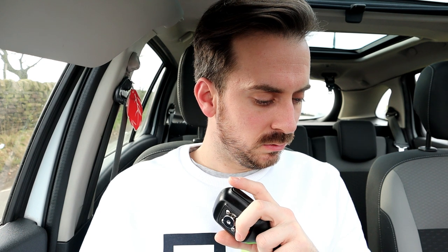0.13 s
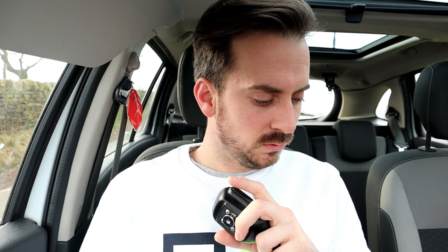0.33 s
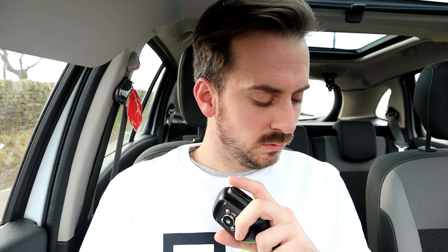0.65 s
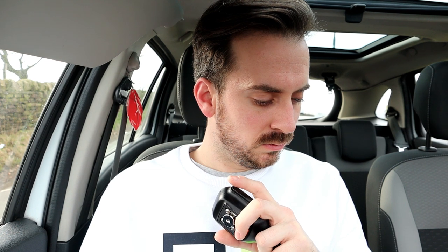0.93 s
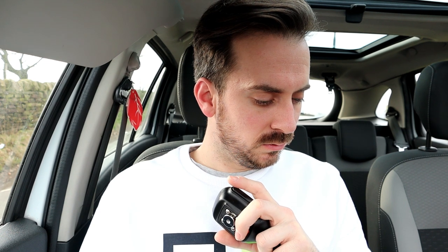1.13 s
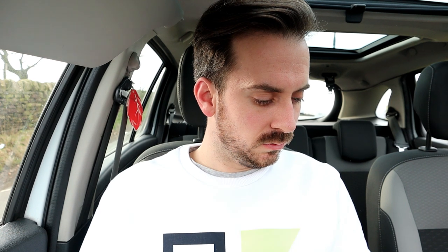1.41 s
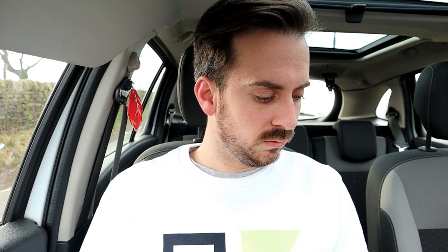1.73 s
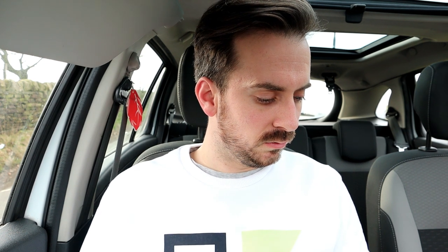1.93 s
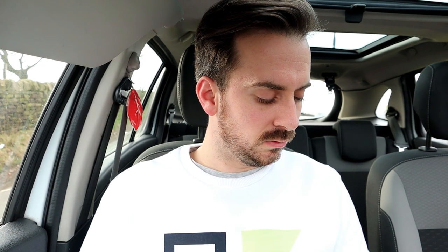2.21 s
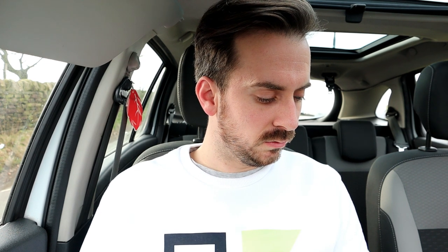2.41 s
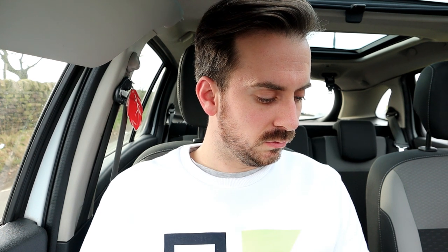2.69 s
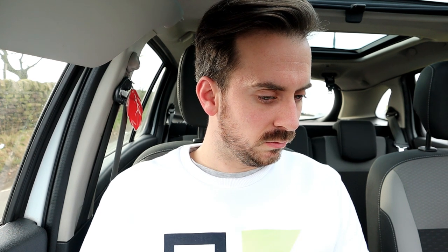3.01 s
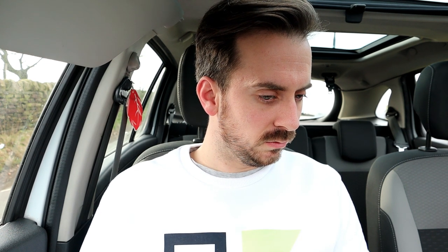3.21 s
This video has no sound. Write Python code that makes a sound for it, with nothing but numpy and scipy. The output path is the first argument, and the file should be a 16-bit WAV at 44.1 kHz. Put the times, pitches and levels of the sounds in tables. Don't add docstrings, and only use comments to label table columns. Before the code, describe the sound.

A four-cylinder car engine idles steadily from start to end, about 3.4 seconds, a deep boomy drone heard inside the parked cabin. Faint belt whine, a soft regular knock and tick, and muffled engine-bay noise ride on it. Near 1.7 and 2.0 seconds a small plastic case clicks down, with faint bright cloth rustles from 1.6 to 2.1 and tiny flicks near 2.5 and 2.7. Wide stereo, bass centred.

```python
import sys
import numpy as np
from scipy import signal
from scipy.fft import rfft, irfft, next_fast_len
from scipy.io import wavfile
from scipy.ndimage import uniform_filter1d, map_coordinates

SR = 44100
rng = np.random.default_rng(int(sys.argv[2]) if len(sys.argv) > 2 else 0)


def wrap_up_sound(samples):
    columns = np.atleast_2d(samples).T
    tamed = np.clip(columns, -1, 1)
    steps = np.round(tamed * 32767).astype(np.int16)
    wavfile.write(sys.argv[1], SR, steps)


def boost(x):
    u = np.asarray(x, float) / 20
    return 10 ** u


N = 147735
FIRING_HZ = 26.657
CYCLE_S = 4 / FIRING_HZ


def unit(x):
    return x / np.sqrt(np.mean(x ** 2) + 1e-20)


def along(points, hz):
    point_hz, value = np.transpose(points)
    return np.interp(np.log(hz + 1), np.log(point_hz + 1), value)


def wobble(rate_hz):
    knots = rng.standard_normal(int(N * rate_hz / SR) + 4)
    return map_coordinates(knots, [np.arange(N) * rate_hz / SR])


def filtered(x, response):
    size = next_fast_len(N + 8192)
    spectrum = rfft(x, size) * response(np.fft.rfftfreq(size, 1 / SR))
    return irfft(spectrum, size)[..., :N]


def rush(spectrum, patchy_db):
    bins = signal.stft(rng.standard_normal(N + 512), nperseg=512)[2]
    patches = uniform_filter1d(rng.standard_normal(bins.shape), size=5, axis=0)
    patches = unit(uniform_filter1d(patches, size=10, axis=1))
    noise = signal.istft(bins * boost(patchy_db * patches), nperseg=512)[1][:N]
    low_hz, high_hz = spectrum[0][0], spectrum[-1][0]

    def response(hz):
        edge = np.minimum(1, np.minimum(hz / low_hz, high_hz / (hz + 1))) ** 4
        return boost(along(spectrum, hz)) * edge

    return unit(filtered(noise, response))


def phase_turn(hz, centre_hz, width_hz):
    return np.arctan2(hz * width_hz, centre_hz ** 2 - hz ** 2)


def drone():
    # order, level_db
    orders = [(1, -25.5), (2, 0), (3, -10), (4, -20), (5, -8.5), (6, -17.5), (7, -20), (8, -23), (9, -32.5),
              (10, -38.5), (11, -30.5), (12, -29.5), (13, -39.5), (14, -40), (15, -32.5), (16, -35.5),
              (17, -45), (18, -44.5), (19, -46.5), (20, -38), (21, -37)]
    # hz, level_db
    side_level = [(50, -59), (130, -39.5), (190, -24), (260, -9.5), (400, -15.5), (800, -8.5)]
    first_firing_s, wander_rad, strongest_db = .0204, .06, -19.5
    cycle = 2 * np.pi * FIRING_HZ * (np.arange(N) / SR - first_firing_s) + wander_rad * wobble(1.5)
    out = np.zeros((2, N))
    for k, db in orders:
        hz = k * FIRING_HZ
        if k <= 8:
            dip = .36 * phase_turn(hz, centre_hz=120, width_hz=20)
            cabin_mode = phase_turn(hz, centre_hz=160, width_hz=26)
            mount = .7 * (np.pi - phase_turn(hz, centre_hz=40, width_hz=3))
            phase = k * cycle + dip - cabin_mode + mount
        else:
            phase = k * cycle - phase_turn(hz, centre_hz=294, width_hz=30)
            if k > 11:
                phase = phase + rng.uniform(-np.pi, np.pi)
        sway_db = (.05 + .1 * k) * wobble(5.094)
        gain = np.sqrt(2) * boost(strongest_db + db + sway_db)
        out += gain * np.array([np.cos(phase), boost(along(side_level, hz)) * np.sin(phase)])
    return out


def belt():
    # pitch_hz, rms_db
    whines = [(488, -58.5), (672, -58), (765, -58), (2686, -76)]
    t = np.arange(N) / SR

    def tone(hz, db):
        gain = np.sqrt(2) * boost(db + 2.5 * wobble(4.9))
        return gain * np.sin(2 * np.pi * hz * t + 2.1 * wobble(9))

    return np.array([sum(tone(hz, db + offset_db) for hz, db in whines) for offset_db in (0, -5)])


def per_cycle(first_s, hz, t60_s, db, scatter_db):
    out, t = np.zeros(N + SR), np.arange(SR // 4) / SR
    starts_s = np.arange(first_s % CYCLE_S, N / SR, CYCLE_S)
    for start_s, (size, pitch) in zip(starts_s, rng.standard_normal((len(starts_s), 2))):
        tone = np.sin(2 * np.pi * hz * (1 + .004 * pitch) * t)
        ring = tone * boost(-60 * t / t60_s) * (1 - np.exp(-t * hz / 2))
        out[round(start_s * SR):][:len(t)] += boost(db + scatter_db * size) * ring
    return out[:N]


def engine_knock():
    low = per_cycle(first_s=.0374, hz=293.5, t60_s=.11, db=-36.5, scatter_db=1)
    high = per_cycle(first_s=.9, hz=487, t60_s=.15, db=-41, scatter_db=3)
    return low + high


def injector_tick():
    return per_cycle(first_s=1, hz=1701, t60_s=.0748, db=-53.5, scatter_db=2.5)


def engine_bay():
    # hz, density_db (per Hz)
    rumble = [(12, -29), (30, -10.5), (50, -0.5), (100, -10.5), (165, -6.5), (240, -19.5), (295, -11),
              (380, -21.5)]
    bay_mid = [(380, -3.5), (480, -4), (600, -4), (700, -3), (820, -9), (960, -9.5), (1100, -17.5),
               (1400, -23)]
    bay_side = [(45, -21), (172, -7), (400, -7), (580, -7), (680, 1), (800, -7.5), (930, -5.5), (1200, -17)]
    air_mid = [(1100, -3), (1500, -6), (2300, -9), (3100, -10.5), (3800, -14.5), (6500, -20.5), (8700, -27),
               (10500, -37.5)]
    air_side = [(710, -28.5), (1200, 0), (1770, -3), (2960, -5.5), (3780, -9.5), (4510, -11.5),
                (11400, -25.5), (14800, -38.5)]
    side_hiss = boost(-52) * rush(air_side, patchy_db=1.1)
    side = boost(-48.5) * rush(bay_side, patchy_db=0) + side_hiss
    left_lean = .16 * filtered(side, lambda hz: np.exp(-((hz - 630) / 580) ** 2))
    right_lean = .023 * side_hiss
    mid = boost(-36) * rush(rumble, patchy_db=-1) + boost(-46) * rush(bay_mid, patchy_db=1)
    mid = mid + boost(-57) * rush(air_mid, patchy_db=.1) + left_lean - right_lean
    knock, tick = engine_knock(), injector_tick()
    return np.array([mid + knock + tick, side + .3 * knock + .8 * tick])


def cloth():
    # centre_s, half_length_s, level_db
    brushes = [
        (1.658, 0.026, -66),
        (1.78, 0.024, -66.5),
        (1.896, 0.032, -72),
        (1.978, 0.046, -74),
        (2.053, .035, -73),
        (2.516, .012, -75),
        (2.661, .012, -75),
    ]
    # hz, density_db (per Hz)
    fabric = [(4000, -21), (8500, -1.5), (11500, 0), (12800, -4), (14000, -21.5)]
    t = np.arange(N) / SR
    shape = sum(boost(db) * np.exp(-((t - centre_s) / half_s) ** 2) for centre_s, half_s, db in brushes)
    shape = shape * boost(2.5 * wobble(150))
    return shape * np.array([rush(fabric, patchy_db=1), boost(2) * rush(fabric, patchy_db=3)])


def case():
    # start_s, level_db, centre_hz, width_octaves
    contacts = [
        (1.7255, -41.5, 1920, 0.29),
        (1.73, -45, 1100, .4),
        (1.965, -53.5, 4400, .2),
        (2.014, -40.5, 1800, 0.87),
        (2.0182, -43, 5500, .9),
        (2.022, -49, 3180, 0.56),
    ]
    # pitch_hz, level_db, t60_s
    modes = [(1050, 2, .02), (1550, 0, 0.042), (1920, 1.5, 0.017), (2180, 1, .02), (2560, -8, .015),
             (3050, -4.5, .02), (3500, 0, .02), (3940, 2, 0.024), (4460, -1, .025), (5630, -6, .01),
             (6250, -4.5, 0.011), (7200, -6, 0.0093), (8300, -12, 0.0092), (10500, -12, .008)]
    out, t = np.zeros((2, N + SR)), np.arange(SR // 10) / SR
    hz, mode_db, t60_s = np.transpose(modes)[:, :, None]
    attack = 1 - np.exp(-t / .00054)
    for start_s, db, centre_hz, width_octaves in contacts:
        near = np.exp(-(np.log2(hz / centre_hz) / width_octaves) ** 2)
        for channel, offset_db in enumerate((0, 2)):
            size_db, phase = rng.standard_normal((2, len(modes), 1))
            decay = boost(mode_db + size_db - 60 * t / t60_s)
            ring = (near * decay * np.sin(2 * np.pi * hz * t + 2 * phase)).sum(axis=0)
            out[channel, round(start_s * SR):][:len(t)] += boost(db + offset_db) * ring * attack
    return out[:, :N]


def scene():
    mid, side = drone() + belt() + engine_bay() + cloth() + case()
    return np.array([mid + side, mid - side])


def microphone_hiss():
    # hz, density_db (per Hz)
    hiss_band = [(12900, -4), (13500, 0), (14900, -1)]
    return boost(-88.5) * filtered(rush(hiss_band, patchy_db=1.5), lambda hz: hz > hiss_band[0][0])


def top_cut(x):
    return signal.sosfilt(signal.butter(12, 14960, fs=SR, output="sos"), x)


def record(dry):
    return top_cut(dry + microphone_hiss())


dry = scene()
out = record(dry)
wrap_up_sound(out)
```